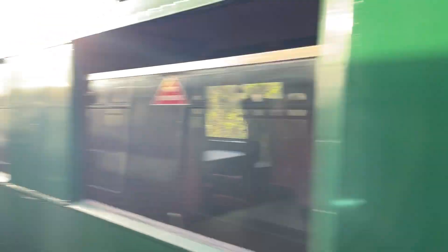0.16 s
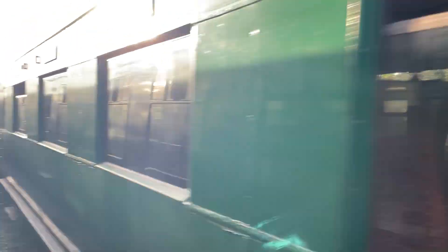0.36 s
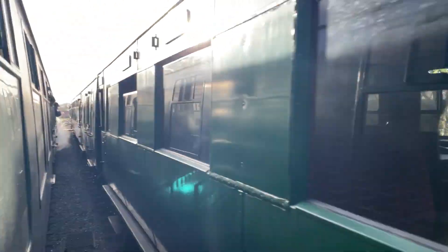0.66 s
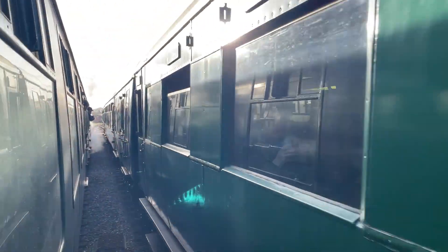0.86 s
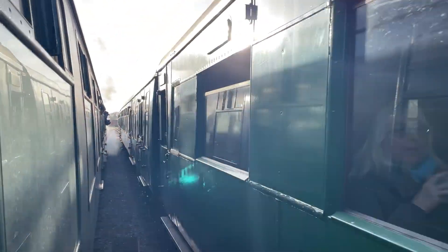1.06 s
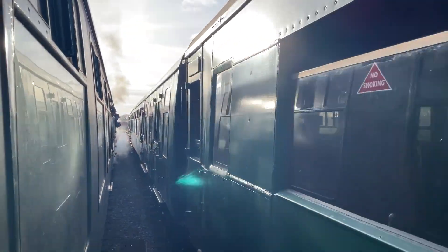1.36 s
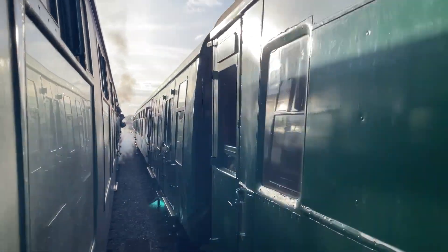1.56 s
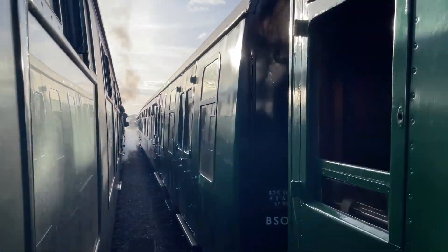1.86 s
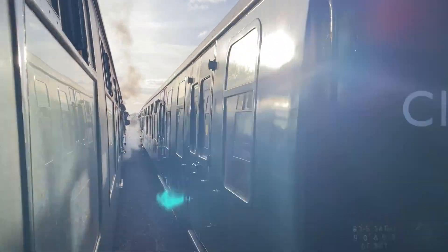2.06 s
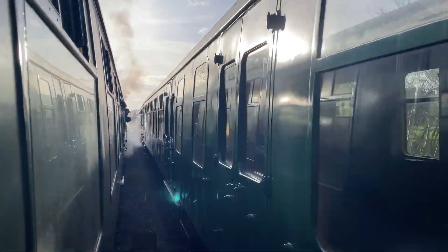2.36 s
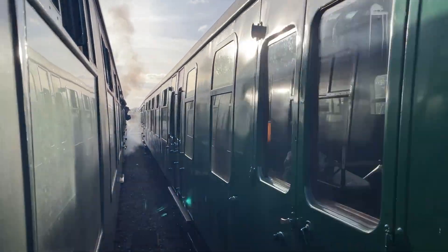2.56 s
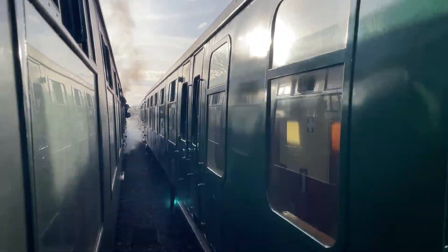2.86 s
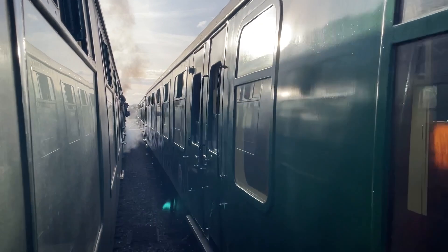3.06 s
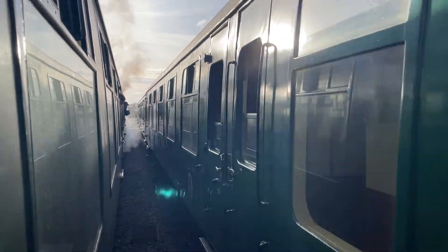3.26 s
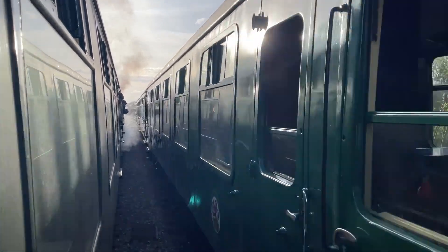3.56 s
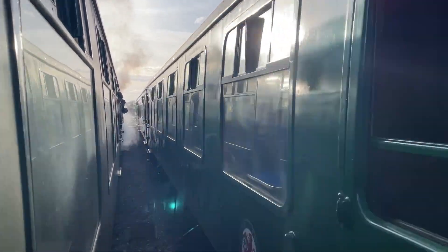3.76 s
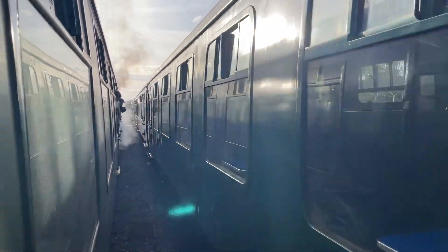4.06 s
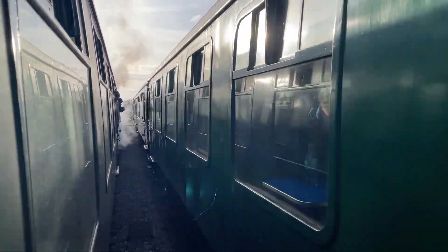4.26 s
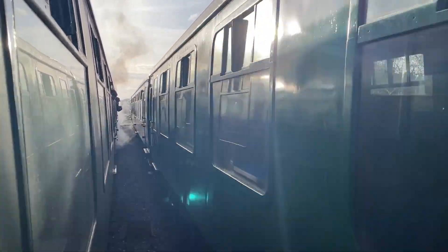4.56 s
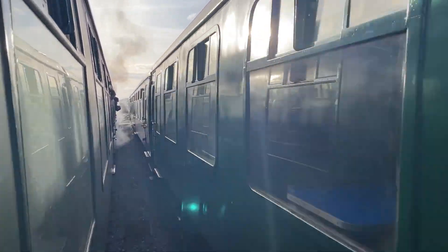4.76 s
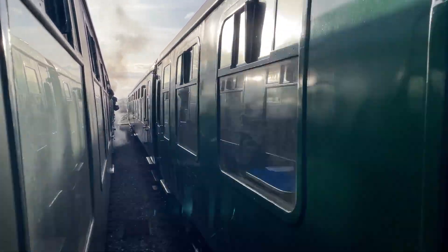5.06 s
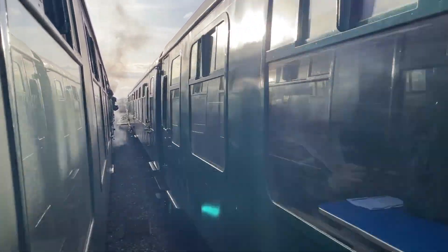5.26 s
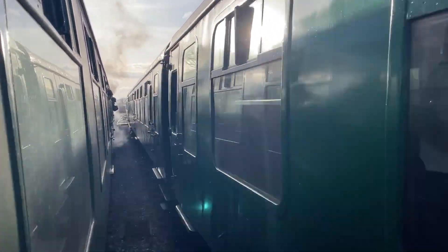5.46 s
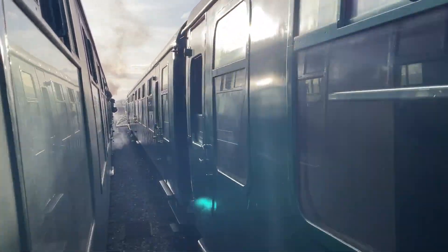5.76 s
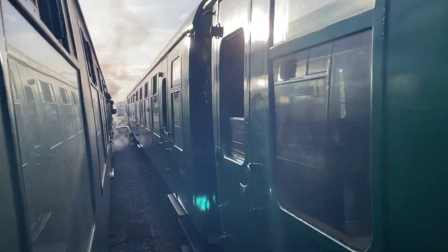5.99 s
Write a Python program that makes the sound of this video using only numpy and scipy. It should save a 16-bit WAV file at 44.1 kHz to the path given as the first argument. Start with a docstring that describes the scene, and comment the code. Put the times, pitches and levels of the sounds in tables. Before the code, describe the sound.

Railway carriages roll past close to a moving train, wheels rumbling and knocking with metallic rings, and a brief rasping flange squeal midway.

```python
"""At the window of a slow train, carriages of another roll past in the narrow gap between the two.
Wheels rumble, roar and hiss over a deep boom; knocks, low thuds and rings of the passing train come by.
Near 2.8 s a flange bites the rail, rasps and squeals; near 4.9 s another scrapes more softly.
Rumble and boom are strongest at the end. A small stereo recorder picks it up: sound along the gap
goes to the centre, sound thrown between the carriage sides to the width."""
import sys
import numpy as np
from scipy import signal
from scipy.fft import rfft, irfft
from scipy.io import wavfile
from scipy.ndimage import uniform_filter1d

SR = 44100
rng = np.random.default_rng(int(sys.argv[2]) if len(sys.argv) > 2 else 0)


def persist_wave(psi):
    """Save psi, clipped to +-1, as 16-bit WAV."""
    counts = np.round(np.clip(psi, -1, 1) * 32767).astype(np.int16)
    wavfile.write(sys.argv[1], SR, np.atleast_2d(counts).T)


N = 270333

# knocks, low thuds and rings of the passing train: start_s, knock_db, then above the knock thud_db,
# clack_db, ring_db; dying_s (each band and the ring take a share of it), then two or more favoured ring_hz
PASSING_BLOWS = [(.27, -35, 16, -16, -20, 0.21, 607, 3040), (.925, -23.5, 9.5, -17, -32, 0.31, 790, 3766),
                 (.972, -32, 13, -20, -20, .12, 750, 1350),
                 (.994, -16.5, 8, -13.5, -12, 0.31, 743, 1190, 4624),
                 (1.074, -28, 8, -22, -14, .15, 750, 1350), (1.148, -27, -6, -24, -8, 0.4, 1350, 2110),
                 (1.434, -28.5, 0, -30, -12, 0.31, 754, 3200),
                 (1.503, -16.5, -8, -13, -19, 0.15, 3618, 4900),
                 (1.511, -13, 2, -22, -18, 0.2, 929, 1357, 1809),
                 (1.596, -31, 18, -32, -27, 0.28, 620, 3200),
                 (1.663, -23.5, -12, -38, -14, 0.27, 630, 3800),
                 (2.083, -30.5, -2, -33, -15.5, 0.21, 624, 2654),
                 (2.268, -15, 5, -13, -13, 0.33, 748, 1830, 3740, 5200),
                 (2.401, -25.5, -11, -24, -8, 0.24, 754, 2130),
                 (2.424, -21, -16, -30, -15, 0.28, 1370, 2654),
                 (2.819, -12.5, 0, -18.5, -20, 0.2, 1180, 2050), (2.953, -21, 0, -19, -14, 0.45, 620, 3240),
                 (2.975, -27, 0, -20, -14, 0.2, 750, 3200), (3.037, -28, -5, -20, -14, 0.15, 750, 930),
                 (3.067, -29, -5, -18, -10, 0.15, 930, 3800),
                 (3.088, -40.5, 23, -11, 7, 0.4, 2060, 2670, 3200),
                 (3.28, -36, 16, -25, -20, .25, 750, 1350), (3.9, -38, 17, -25, -20, .25, 630, 1350),
                 (3.97, -35, -12, -31, -2, 0.5, 760, 2070), (4.097, -37, 13, 4, -13, 0.05, 3740, 5250),
                 (4.19, -40, 19, -25, -20, .25, 630, 1350), (4.455, -32, 3, -25, -15, .3, 550, 2060),
                 (4.528, -31, 5, -30, -8, 0.56, 630, 2100), (4.606, -26, -10, -24, -17, 0.23, 930, 2070),
                 (4.893, -25.5, 2, -11, -3, 0.2, 549, 2900, 3960),
                 (5.108, -33, 9, -15, -6.5, 0.44, 1326, 3160),
                 (5.326, -9.5, 1, -15, -11, 0.33, 1814, 3160, 3745, 4450, 5873),
                 (5.398, -22, 7, -18, -14, .2, 750, 1345), (5.467, -19.5, 0, -20.5, -16, 0.33, 754, 3220),
                 (5.489, -15.5, -1, -23.5, -13, 0.22, 750, 930), (5.507, -23, 8, -30, -5, .12, 1365, 750),
                 (5.85, -31, -14, -10.5, -6, 0.73, 617, 2654),
                 (5.907, -13, 5, -14, -14, 0.3, 750, 3200, 4620),
                 (5.965, -24, 9, -15, -12, .3, 2070, 3200, 4620), (5.988, -23, 8, -16, -12, .2, 750, 2070),
                 (6.026, -24, 8, -22, -14, 0.3, 620, 3040), (6.047, -19, 4, -22, -17, 0.2, 925, 3200),
                 (6.071, -13.5, -9, -22, -17, 0.25, 750, 925), (6.108, -22, 10, -20, -16, .2, 750, 1350)]
# wheel and rail modes: pitch_hz, width_hz, level_db
WHEEL_MODES = [(543, 24, -3), (628.7, 13.3, 0.5), (752, 40, -2.5), (929, 18, -8), (1179, 7.2, -13),
               (1352, 11.3, -7.5), (1820, 15.7, -8), (2055, 23, -13), (2670, 7, -21), (2990, 68, -18),
               (3180, 36, -14.5), (3780, 18, -17.5), (3980, 55, -35), (4390, 41, -19.5), (4620, 26, -16.5),
               (4940, 14, -23), (5210, 23, -18), (5870, 25, -24)]
# carriage floor and bogie frame modes: pitch_hz, width_hz, level_db
BODY_MODES = [(72, 32, -4), (98.3, 19.2, 1.5), (123.3, 12.7, -4), (158, 9.3, -5), (194.7, 23.5, 0.5),
              (235.3, 17.5, -4), (288.6, 19.3, -10), (317.8, 33, -13)]


def rolling():
    """Rough contact of wheel and rail: rumble of floors, roar of wheels and hiss as bogies come near."""
    # colour of the rumble of floors and track: pitch_hz, level_db (per Hz)
    rumble_colour = [(25, -50), (40, -29), (65, -4), (96, -3), (190, -4.5), (242, -14), (299, -16),
                     (331, -20), (500, -27), (700, -57.5)]
    # colour of the roar of near wheels on rail: pitch_hz, level_db (per Hz)
    roar_colour = [(180, -12.5), (300, -7.5), (480, -15), (728, -18.5), (917, -28), (1380, -23.5),
                   (1550, -33), (2500, -38.5), (3250, -75), (5500, -120)]
    # colour of the hiss of rolling contact: pitch_hz, level_db (per Hz)
    hiss_colour = [(1200, 0.5), (2000, 1.5), (3500, -2.5), (5500, -7), (7000, -9.5), (9500, -17.5),
                   (12000, -17.5), (14500, -34)]
    # bogie frame modes that swell with the roar: pitch_hz, width_hz, level_db
    bogie_modes = [(284.8, 22.4, 2), (309, 9.2, -3.5)]
    # rolling of the nearest bogies: time_s, rumble_db, roar_db (before frames and shudder add to it)
    nearness = [(0.0, -33, -44), (0.15, -31, -42), (0.5, -30.5, -37), (0.8, -32.5, -36.5), (0.98, -29, -31),
                (1.25, -24.5, -34), (2.05, -24.5, -32.5), (2.41, -23, -33.5), (2.85, -23.5, -32),
                (3.05, -24, -34), (3.3, -24, -35.5), (3.8, -27.5, -39), (4.4, -27.5, -38.5),
                (4.63, -26.5, -33.5), (4.95, -25, -37), (5.3, -21.5, -25.5), (5.6, -23.5, -29),
                (5.8, -19, -28), (6.13, -15, -29.5)]
    body_hum_db, wheel_ring_db, bogie_hum_db = -0.5, -10, -0.5
    blur = 2.1  # many unlike wheels widen the modes while rolling
    middle_db = -25  # rumble level around which the hiss follows
    hiss_db, hiss_follows, hiss_grows_db_per_s = -45, 0.1, 0.53

    rumble = noise(rumble_colour, patchy_db=3.0, flicker_db=2.0)
    rumble = evened(rumble + amp(body_hum_db) * hum(BODY_MODES))

    roar = noise(roar_colour, patchy_db=2.5, flicker_db=0.3) * chatter(depth_db=1.27, size=400)
    roar = roar + amp(wheel_ring_db) * hum(np.multiply(WHEEL_MODES, [1, blur, 1]))
    roar = evened(roar) + amp(bogie_hum_db) * hum(bogie_modes)

    hiss = noise(hiss_colour, patchy_db=1.7, flicker_db=0.96)
    t = np.arange(N) / SR
    rumble_db = curve(nearness, count=1)
    hiss_level_db = hiss_db + hiss_follows * (rumble_db - middle_db) + hiss_grows_db_per_s * t
    roar_gain = np.sqrt(amp(curve(nearness, count=2)) ** 2 + shudder())
    return rumble * amp(rumble_db) + roar * roar_gain + hiss * amp(hiss_level_db)


def shudder():
    """Power of the roar that swells and sinks after each blow of the passing train."""
    below_knock_db, peak_s = -14, 0.066  # peak_s: time from the blow to the top of the swell
    starts = np.zeros(N)
    for start_s, knock_db, *_ in PASSING_BLOWS:
        starts[round(start_s * SR)] += amp(knock_db + below_knock_db) ** 2
    u = np.arange(SR // 2) / SR / peak_s
    swell = (u * np.exp(1 - u)) ** 2
    return np.abs(signal.oaconvolve(starts, swell)[:N])


def knocks_and_rings():
    """Each blow shakes loose parts, a rattle that dies band by band, and rings wheel and body."""
    # colour of the rattle: pitch_hz, level_db (per Hz)
    knock_colour = [(30, -30), (60, -16), (110, -3.5), (290, 0.5), (500, -4.5), (1000, -12), (2000, -27),
                    (4500, -28.5), (7000, -40), (11500, -76), (13500, -77), (14500, -60)]
    # thud, knock, rap, clack and fizz bands: low_hz, high_hz
    bands_hz = [(0, 350), (350, 900), (900, 1550), (1550, 8000), (8000, 15000)]
    # time constant of each band's rise, bass slowest: rise_s
    rise_s = [0.012, 0.004, 0.0035, 0.0035, 0.0017]
    # dying time of each band: share of the blow's dying_s
    lasts = [0.67, 0.65, 0.55, 1.08, 0.67]
    crack_db, crack_s = [-4, 1.5, 2, 2.5, -5], 0.026  # first instant stands out: per band, dying time
    fizz_db, fizz_follows = -12, 1  # above the knock, and dB per dB of clack
    rap_db, rap_follows = -4, 0.22  # above the knock, and dB per dB of clack
    body_strike_db = -2.5
    ring_lasts, ring_rise_s = 3.2, 0.012  # share of dying_s; builds up as the wheel takes the load

    hz = np.fft.rfftfreq(N, 1 / SR)
    shake = rfft(noise(knock_colour, patchy_db=4.0, flicker_db=3.5) * chatter(depth_db=1.5, size=140))
    bands = np.array([steadied(irfft(shake * ((hz >= low) & (hz < high)), N),
                               size=1300 if low == 0 else 260) for low, high in bands_hz])

    t = np.arange(SR // 3) / SR
    rise = 1 - np.exp(-t / np.array(rise_s)[:, None])
    crack = 1 + amp(np.array(crack_db)[:, None] - 60 * t / crack_s)
    ring_rise = 1 - np.exp(-t / ring_rise_s)
    ring_end = np.minimum(20 * t[::-1], 1)  # fades out over the last 50 ms
    # a sharper clack reaches the higher modes
    sharp = 0.57 * np.clip(np.log2(np.array(WHEEL_MODES)[:, :1] / 1400), 0, 1.5)

    blows = all_blows()
    luck = rng.standard_normal((len(blows), len(WHEEL_MODES) + len(BODY_MODES), 3))
    ringing = np.zeros((2, N + SR))
    power = np.zeros((len(bands_hz), N + SR))
    for (start_s, knock_db, thud_db, clack_db, ring_db, dying_s, *ring_hz), chance in zip(blows, luck):
        body_chance, wheel_chance = chance[:len(BODY_MODES)], chance[len(BODY_MODES):]
        at = slice(round(start_s * SR), round(start_s * SR) + len(t))

        band_db = np.array([thud_db, 0, rap_db + rap_follows * clack_db, clack_db,
                            fizz_db + fizz_follows * clack_db])[:, None]
        fall_db = -60 * t / (dying_s * np.array(lasts)[:, None])
        power[:, at] += (rise * crack * amp(knock_db + band_db + fall_db)) ** 2

        ring = struck(wheel(ring_hz, wheel_chance[:, 2]), t, sharp * (clack_db + 21), wheel_chance,
                      damping=0.42, spread=0.12, beats_hz=18.0)
        ring = ring * amp(knock_db + ring_db - 60 * t / (ring_lasts * dying_s))
        thud = struck(BODY_MODES, t, 0, body_chance, damping=1.0, spread=1, beats_hz=10.0)
        thud = thud * amp(knock_db + thud_db + body_strike_db)
        ringing[:, at] += ring_rise * ring * ring_end + rise[0] * thud

    rattle = (bands * np.sqrt(power[:, None, :N])).sum(0)
    return ringing[:, :N] * chatter(depth_db=2.5, size=220) + rattle * chatter(depth_db=1.8, size=90)


def all_blows():
    """Blows of the passing train, and the bites of the flange as it meets the rail."""
    # bites of the flange: start_s, knock_db, then two or more favoured ring_hz
    bites = [(2.841, -16, 1180, 2990), (2.859, -14.5, 1180, 2990, 4900), (2.877, -19, 2070, 2990),
             (2.891, -14.5, 750, 2990), (2.916, -17, 2070, 4390), (2.932, -22, 1350, 3200)]
    # every bite, levels above its knock: thud_db, clack_db, ring_db, dying_s
    judder = (-3, -10, -8.5, 0.08)
    return PASSING_BLOWS + [(start_s, knock_db, *judder, *ring_hz) for start_s, knock_db, *ring_hz in bites]


def wheel(ring_hz, chance):
    """Modes of one wheel: each a little off by chance, the favoured ones at their own pitch and louder."""
    favour_db, wheels_differ = 8, 0.006  # wheels_differ: spread of pitch as a share
    modes = np.array(WHEEL_MODES, float)
    apart = np.log(np.array(ring_hz) / modes[:, :1])
    nearest = np.abs(apart).argmin(0)
    modes[:, 0] *= 1 + wheels_differ * chance
    modes[nearest, 0] = ring_hz
    modes[nearest, 2] += favour_db
    return modes


def flange():
    """Steel scrapes on steel: a wide rasp, and fuzzy squeals where the wheel rim resonates."""
    # flange against rail: start_s, rasp_db, squeal_hz at the start
    scrapes = [(2.828, -21.5, 5560), (4.888, -33, 5450)]
    # colour of the rasp: pitch_hz, level_db (per Hz)
    rasp_colour = [(530, -21), (900, -4), (1190, -5), (2310, -9), (2900, -1), (3610, -11), (5460, -9),
                   (7110, -11), (7980, -19), (11400, -17), (14000, -27)]
    # rim modes of the high squeal: pitch_hz, width_hz, level_db
    rim_modes = [(11600, 250, -5), (11800, 210, 3.5), (12900, 300, -11), (13900, 270, 2)]
    # squeal through both scrapes: time_s, low_squeal_db, high_squeal_db
    squeal_levels = [(2.825, -75, -80), (2.85, -41, -40), (2.9, -34.5, -43), (2.97, -38.5, -45),
                     (3.07, -43, -50), (3.104, -37.5, -37.5), (3.14, -40.5, -53), (3.18, -46, -48),
                     (3.24, -84, -103), (4.9, -80, -90), (4.94, -46.5, -60), (5.03, -47, -62),
                     (5.07, -55, -70), (5.11, -86, -99)]
    rasp_rise_s, rasp_dying_s = 0.016, 0.37
    sag_hz_per_s, wobble_hz, low_width_hz = 650, 30, 260

    t = np.arange(N) / SR
    rasp = noise(rasp_colour, patchy_db=3.5, flicker_db=2.0) * chatter(depth_db=2.0, size=200)
    rasp = steadied(rasp, size=1300)
    rasp_gain = sum(amp(rasp_db) * blow(start_s, rasp_rise_s, rasp_dying_s)
                    for start_s, rasp_db, _ in scrapes)

    jolts = chatter(depth_db=2.4, size=300)  # uneven stick and slip
    slip = rng.standard_normal((2, N)) * jolts
    high = steadied(hum(rim_modes) * jolts, size=1300)

    # the low squeal sags in pitch after each start, and wobbles
    hz = np.full(N, float(scrapes[0][-1]))
    for start_s, _, squeal_hz in scrapes:
        hz = np.where(t >= start_s, squeal_hz - sag_hz_per_s * (t - start_s), hz)
    hz = hz + wobble_hz * evened(uniform_filter1d(rng.standard_normal(N), size=900))
    low = resonate(resonate(slip, hz, low_width_hz), hz, low_width_hz)
    low = steadied(low, size=1300)
    return (rasp * rasp_gain
            + low * amp(curve(squeal_levels, count=1))
            + high * amp(curve(squeal_levels, count=2)))


def boom():
    """The deepest boom of the gap between the trains: wavering low noise."""
    # colour of the boom: pitch_hz, level_db (per Hz)
    boom_colour = [(18, -62), (32, -27), (50, 2), (75, 3.5), (110, -19), (200, -78)]
    # level of the boom: time_s, level_db
    boom_levels = [(0.0, -43), (0.6, -38), (1.4, -45), (2.1, -42), (2.5, -30.5), (3.1, -29.5), (3.6, -36.5),
                   (4.45, -27), (5.0, -42), (5.6, -22.5), (5.85, -34.5), (6.13, -11)]
    deep = noise(boom_colour, patchy_db=3.0, flicker_db=3.5) * chatter(depth_db=1.5, size=9000)
    return deep * amp(curve(boom_levels, count=1))


def hum(modes):
    """Rough contact keeps a set of modes sounding, each swelling and fading by chance."""
    f = np.fft.rfftfreq(N, 1 / SR)
    peaks = sum(amp(db) / (1 + 2j * (f - hz) / width) ** 2 for hz, width, db in modes)
    return evened(irfft(rfft(rng.standard_normal((2, N))) * peaks, N))


def struck(modes, t, favour_db, chance, damping, spread, beats_hz):
    """All modes ring from one blow, each beating in level at its own rate; wider modes die sooner."""
    hz, width, db = np.transpose(modes)[:, :, None]
    rate = beats_hz * (1 + 0.2 * chance[:, 1:2])
    beat = 1 - 0.75 * np.cos(2 * np.pi * (rate * t + spread * chance[:, :1]))
    level_db = db + favour_db + (1 + spread) * chance[:, :1]
    size = amp(level_db) * beat * np.exp(-np.pi * damping * width * t)
    # the two rows differ in the phase of each mode
    return np.array([(size * np.sin(2 * np.pi * (hz * t + chance[:, k, None]))).sum(0) for k in (1, 2)])


def resonate(x, hz, width):
    """Shifts the curve hz down to zero, smooths, and shifts back: a resonance of gain 1."""
    turn = np.exp(2j * np.pi * np.cumsum(hz * np.ones(N)) / SR)
    r = np.exp(-np.pi * width / SR)
    return 2 * (turn * signal.lfilter([1 - r], [1, -r], x / turn)).real


def noise(spectrum, patchy_db, flicker_db):
    """Two unrelated noises of one colour, with shared drifting patches and flicker."""
    frames = N // 128 + 5
    patches = uniform_filter1d(rng.standard_normal((frames, 257)), 24, 0)  # along time
    patches = evened(uniform_filter1d(patches, 6, 1))  # along pitch
    flicker = evened(uniform_filter1d(rng.standard_normal(frames), 8))[:, None]
    z = rng.standard_normal((2, frames, 257)) + 1j * rng.standard_normal((2, frames, 257))
    z = z * amp(patchy_db * patches + flicker_db * flicker)
    x = signal.istft(z, nperseg=512, noverlap=384, time_axis=1, freq_axis=2)[1][:, :N]
    colour = amp(read(spectrum, np.fft.rfftfreq(N, 1 / SR)))
    return evened(irfft(rfft(x) * colour, N))


def chatter(depth_db, size):
    """Quick uneven jolts of loose parts, as a gain; size in samples sets how slow."""
    return amp(depth_db * evened(uniform_filter1d(rng.standard_normal(N), size)))


def steadied(x, size):
    """Evens out slow chance swells, so that a burst is as loud as its blow."""
    return x / np.sqrt(np.abs(uniform_filter1d(x ** 2, size)) + 1e-12)


def blow(start, rise_s, dying_s):
    """Envelope that rises quickly at start and then dies away by 60 dB in dying_s."""
    t = np.maximum(np.arange(N) / SR - start, 0)
    return (1 - np.exp(-t / rise_s)) * amp(-60 * t / dying_s)


def amp(db):
    """Gain of a level in dB."""
    return 10 ** (np.asarray(db) / 20)


def evened(x):
    """Scales to an overall RMS of 1."""
    return x / np.sqrt(np.mean(x ** 2) + 1e-20)


def read(points, hz):
    """Reads a table over pitch, with straight lines on a log scale of Hz."""
    f, value = np.transpose(points)
    return np.interp(np.log(hz + 1), np.log(f + 1), value)


def curve(rows, count):
    """One column of a table over time, sample by sample."""
    rows = np.asarray(rows)
    return np.interp(np.arange(N) / SR, rows[:, 0], rows[:, count])


def scene():
    """Row 0 is sound arriving along the gap, row 1 sound thrown between the carriage sides."""
    return rolling() + knocks_and_rings() + flange() + boom()


def record(dry):
    """Close ports share the bass and cancel in the sum where they lie half a wave apart."""
    # rough level of the stereo width by pitch, very narrow at 10.8 to 12.3 kHz: pitch_hz, level_db
    width_levels = [(50, -15.5), (150, -15), (300, -15), (600, -9.5), (1200, 1.5), (2000, -1), (4000, -4),
                    (7000, 1.5), (8500, 3), (10200, -1.5), (10800, -23), (12300, -25), (12800, -1),
                    (14000, -4)]
    # part of the centre that leans left: pitch_hz, share
    lean = [(50, 0.22), (150, 0.0058), (600, 0.0049), (1200, 0.3), (3000, -0.097), (8000, 0.058)]
    # part of the centre that reaches one port first, a quarter cycle apart: pitch_hz, share
    lag = [(100, 0.037), (600, 0.13), (1200, 0.56), (2500, 0.34), (5000, 0.32), (8000, .1)]
    notch_hz, notch_width_hz, notch_db = 8450, 550, -20
    top_hz, top_fall_db_per_khz = 12860, -23  # sound along the gap fades above top_hz
    edge_hz = 14400  # band limit of the recorder
    soft_clip = 0.95  # share of full scale where the recorder rounds the peaks
    fade_s = 0.003  # both ends fade briefly so that nothing clicks

    hz, t = np.fft.rfftfreq(N, 1 / SR), np.arange(N) / SR
    notch = amp(notch_db * np.exp(-((hz - notch_hz) / notch_width_hz) ** 4))
    top = amp(top_fall_db_per_khz * np.maximum(hz - top_hz, 0) / 1000)
    fade = np.minimum(np.minimum(t, t[::-1]) / fade_s, 1)
    along, sideways = rfft(dry * fade)
    along = along * notch * top
    centre = irfft(along, N)
    across = sideways * amp(read(width_levels, hz)) + along * (read(lean, hz) + 1j * read(lag, hz))
    across = irfft(across, N)

    pair = np.array([centre + across, centre - across])
    pair = pair / (1 + (pair / soft_clip) ** 4) ** 0.25
    band_limit = signal.firwin(511, edge_hz, window=("kaiser", 9), fs=SR)
    return signal.oaconvolve(pair, band_limit[None], "same")


dry = scene()
out = record(dry)
persist_wave(out)
```